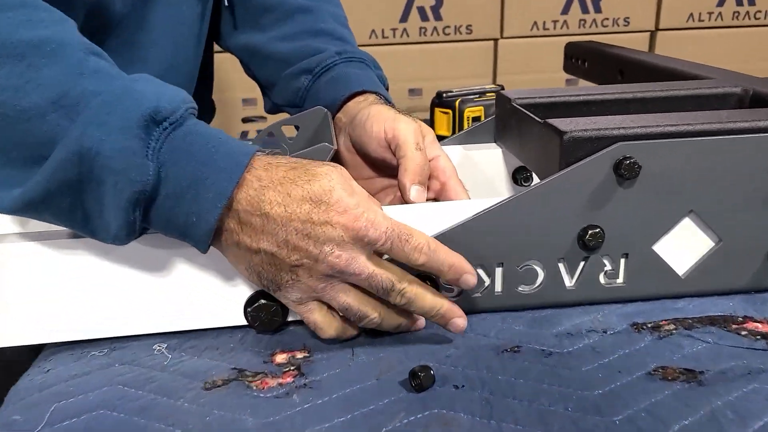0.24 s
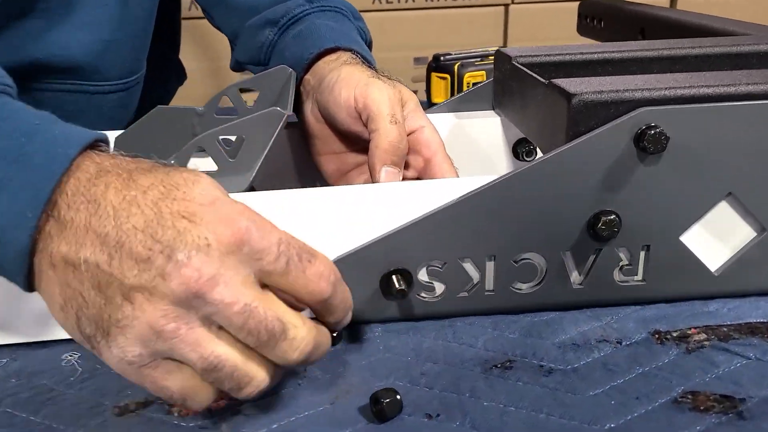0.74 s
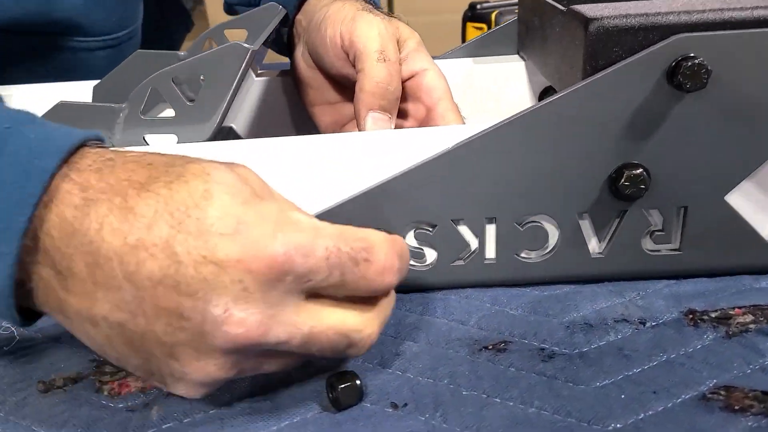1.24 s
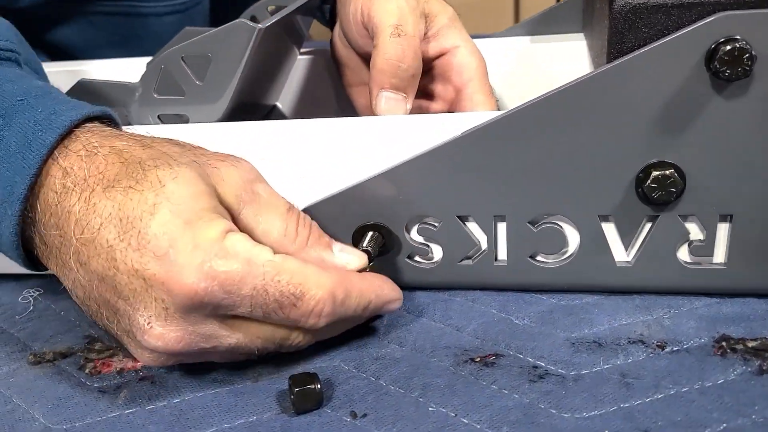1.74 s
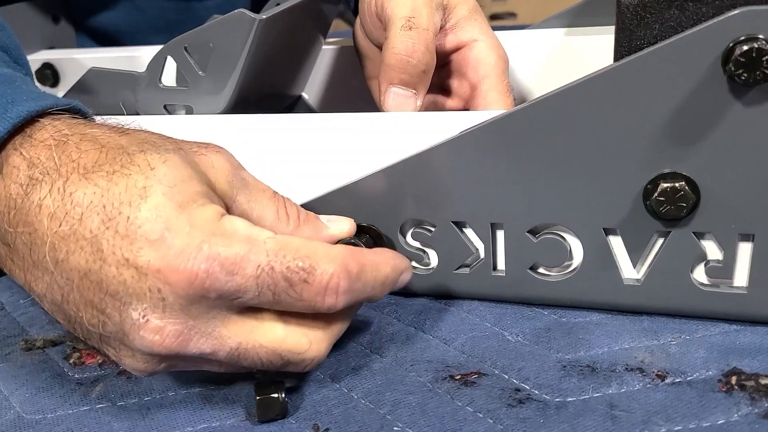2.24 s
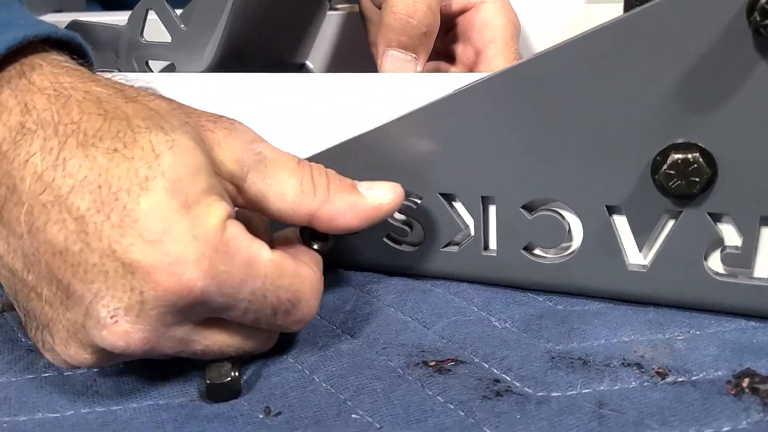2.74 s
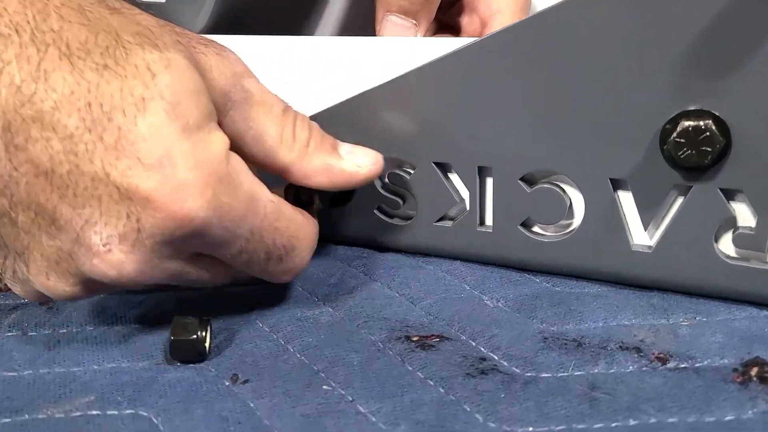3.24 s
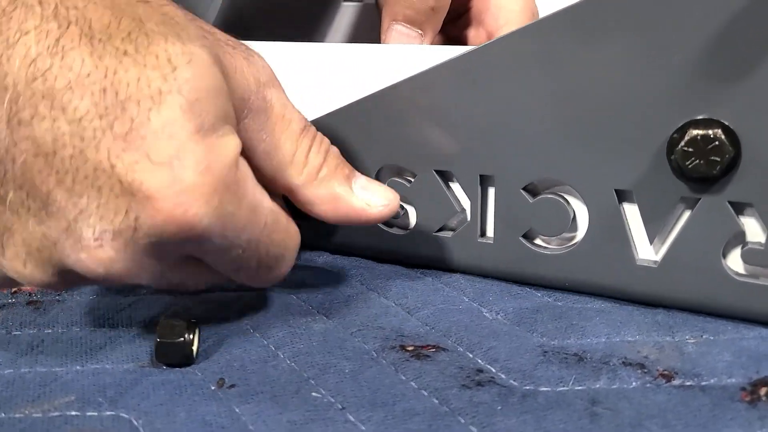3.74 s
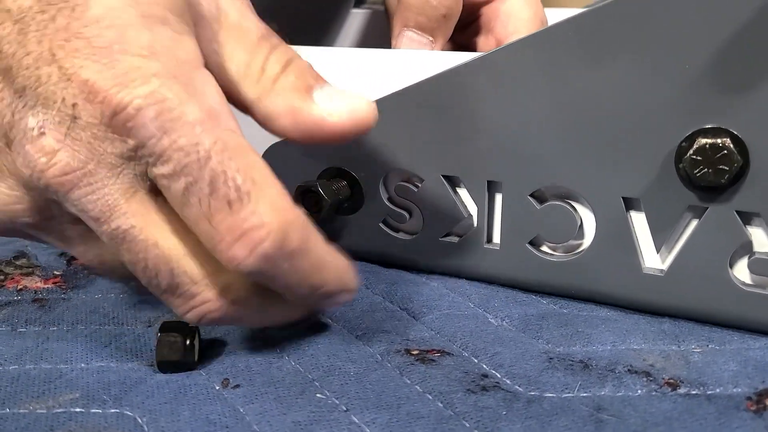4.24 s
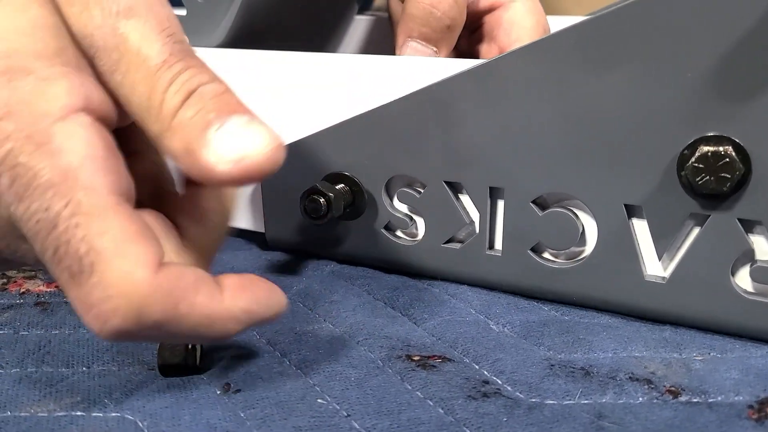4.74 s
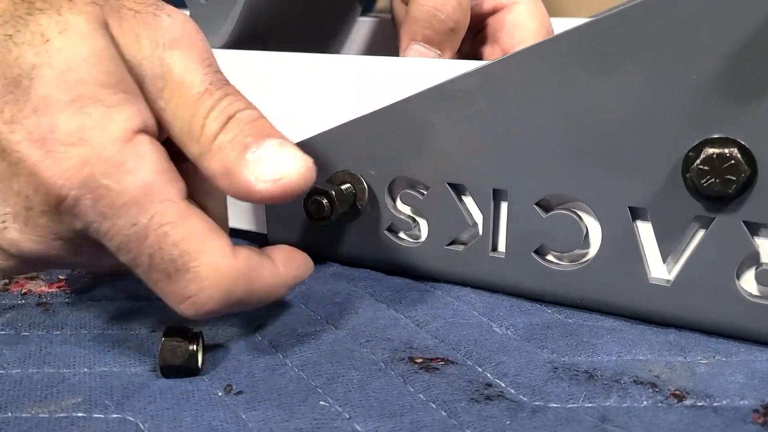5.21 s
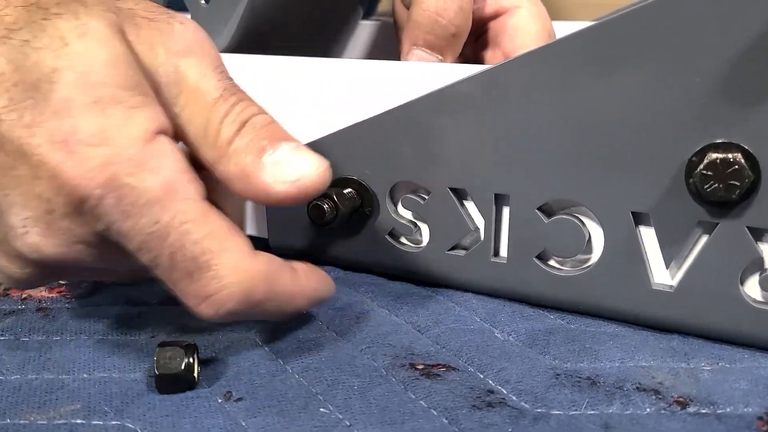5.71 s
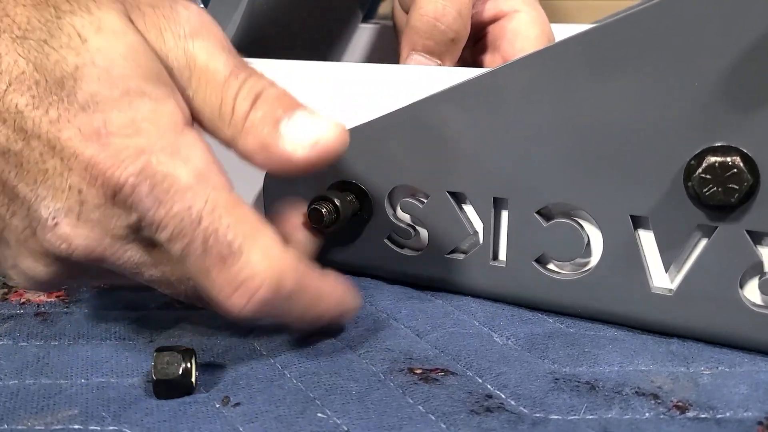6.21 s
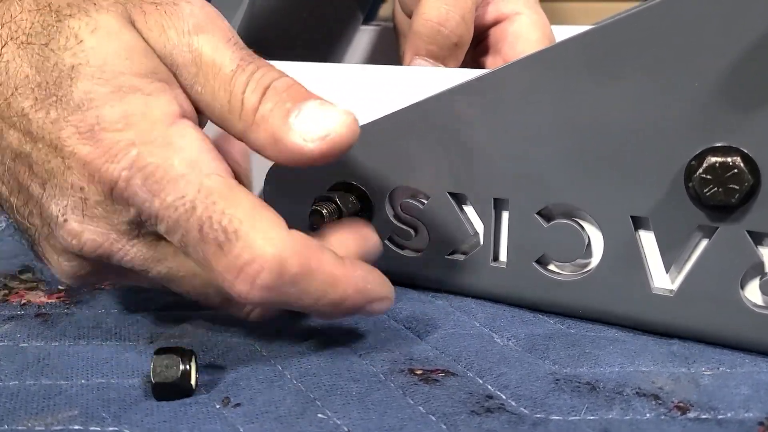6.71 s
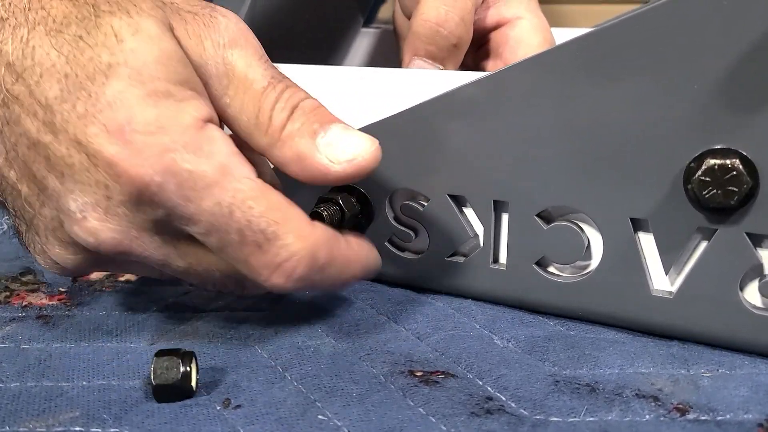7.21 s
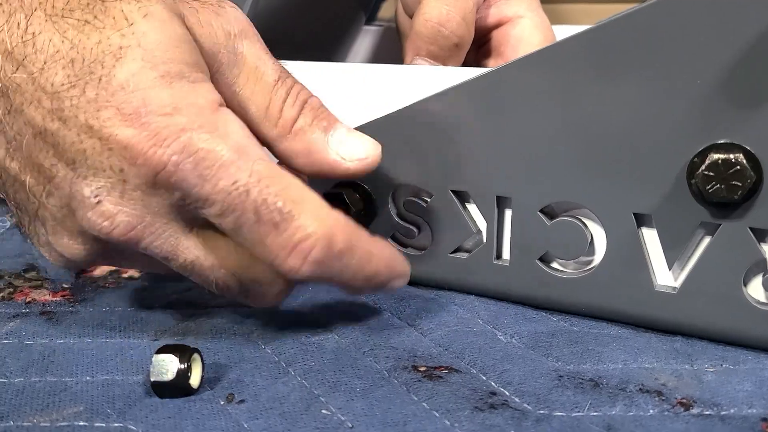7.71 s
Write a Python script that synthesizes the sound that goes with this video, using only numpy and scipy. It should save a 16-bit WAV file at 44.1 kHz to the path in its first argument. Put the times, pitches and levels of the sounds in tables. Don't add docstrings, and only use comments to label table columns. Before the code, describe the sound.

Close up in a quiet workshop, a hard fingertip taps and fumbles a steel nut onto a bolt, with uneven clicks, soft skin brushes and small pings. After about four seconds it is flicked round roughly four times a second: tick, brief ratcheting rattle, hard stop. The steel plate rings shortly, the hollow frame knocks dully, and a loose washer sometimes sings very high. Low machinery hums beneath in stereo.

```python
import sys
import numpy as np
from scipy import signal
from scipy.fft import rfft, irfft, next_fast_len
from scipy.io import wavfile
from scipy.ndimage import map_coordinates

SR = 44100
rng = np.random.default_rng(int(sys.argv[2]) if len(sys.argv) > 2 else 0)


def persist_wave(psi):
    counts = np.round(np.clip(psi, -1, 1) * 32767).astype(np.int16)
    wavfile.write(sys.argv[1], SR, np.atleast_2d(counts).T)


def undo_db(level):
    steps = np.asarray(level, float) / 20
    return 10 ** steps


N = 350815


def unit(x):
    return x / np.sqrt(np.mean(np.abs(x) ** 2) + 1e-20)


def along(points, hz):
    f, v = np.transpose(points)
    return np.interp(np.log(hz + 1), np.log(f + 1), v)


def filtered(x, response):
    n = x.shape[-1]
    m = next_fast_len(n + 8192)
    hz = np.fft.rfftfreq(m, 1 / SR)
    return irfft(rfft(x, m) * response(hz), m)[..., :n]


def resonances(modes, hz):
    center, width, db = np.transpose(modes)[..., None]
    sign = (-1) ** np.arange(len(modes))[:, None]
    return sign * undo_db(db) * 1j * hz * width / (center * center - hz * hz + 1j * hz * width)


def causal(gain):
    cepstrum = irfft(np.log(gain + 1e-6))
    half = len(cepstrum) // 2
    cepstrum[1:half] *= 2
    cepstrum[half + 1:] = 0
    return np.exp(rfft(cepstrum))


def grit(shape, spread_db):
    sizes = undo_db(spread_db * rng.standard_normal(shape))
    return unit(rng.standard_normal(shape) * sizes)


# frequency in Hz, level in dB per Hz.
AIR_COLOUR = [(12, -43), (20, -8.5), (70, -1.5), (113, -13), (198, -18.5), (347, -17.5), (472, -21),
              (949, -26.5), (1190, -26.5), (2460, -29.5), (3840, -32), (4180, -35), (4940, -40),
              (6900, -40.5), (7700, -46.5), (16000, -49.5)]
# frequency in Hz, likeness from -1 to 1.
AIR_LIKENESS = [(60, 0.96), (180, 0.84), (550, 0.73), (1650, -0.25), (4970, 0.1), (15000, -0.73)]
# frequency in Hz, width in Hz, rms level in dB.
MACHINERY = [(58.53, 3.7, -59.5), (118.6, 12.3, -65), (173.8, 9.1, -72), (240.8, 10, -76), (4200, 30, -84)]


def background():
    def colour(hz):
        turn = np.arccos(np.clip(along(AIR_LIKENESS, hz), -1, 1)) / 2
        return undo_db(along(AIR_COLOUR, hz)) * [np.cos(turn), np.sin(turn)]

    mid, side = filtered(rng.standard_normal((2, N)), colour)
    drift = map_coordinates(rng.standard_normal(24), [np.arange(N) * 2.65 / SR])
    air = undo_db(-55.5 + 0.52 * drift) * unit(np.array([mid + side, mid - side]))
    drones = 0
    for center, width, db in MACHINERY:
        hum = filtered(rng.standard_normal(N), lambda hz: resonances([(center, width, 0)], hz)[0] ** 2)
        drones = drones + undo_db(db) * unit(hum)
    return undo_db([[-2.6], [-1.4]]) * (air + drones)


# start in seconds, level in dB, frame knock in dB, brightness in dB.
STARTING_TAPS = [(.0081, -33.5, -24.5, -22), (.067, -40, -22, -17.5), (0.1261, -44.5, -19, -31),
                 (0.216, -23, -22, -10), (.3732, -37, -18, -38), (0.4052, -21.5, -26.5, -14),
                 (0.5662, -47, -24, -27.5), (0.6808, -34, -25, -18.5), (.8954, -53, -5.5, -17.5),
                 (1.3424, -54, -11.5, -26), (1.552, -34.5, -25, -24.5), (1.5841, -50, -21, -45),
                 (1.7071, -62, -6, -16), (1.7269, -58, -5, -35), (1.7848, -31.5, -16, -21),
                 (2.0661, -39.5, -13.5, -27), (2.2193, -41.5, -22, -17.5), (2.3516, -55.5, -11, -28),
                 (2.4432, -53, -9, -28), (2.6197, -49.5, -3, -21), (2.7759, -54, -13, -19),
                 (2.9361, -40, -15, -29), (2.96, -34, -22, -22), (3.1763, -37.5, -11, -19.5),
                 (3.2187, -46.5, -14, -19), (3.5523, -61.5, -12, -41), (3.6126, -53, 1, -24)]


def taps():
    return [(*row, 0.0029, 0.011) for row in STARTING_TAPS]


# start in seconds, level in dB.
SKIN_BRUSHES = [(.0259, -43), (.107, -53.5), (.1758, -57), (.2764, -49), (.4654, -50.5), (1.0081, -67),
                (2.0962, -56.5), (2.1587, -57.5), (2.2653, -62.5), (2.6896, -62), (2.6019, -65.5),
                (2.7555, -57.5), (3.2516, -52), (4.5488, -68)]


def brushes():
    return [(s, db, .02, .04, 0) for s, db in SKIN_BRUSHES]


# catch in seconds, catch level in dB, stop in seconds, stop level in dB.
NUT_TURNS = [(.583, -46.5, .619, -43), (.6397, -44.5, .6996, -48), (0.7332, -45, .775, -49.5),
             (1.7947, -25.5, 1.8249, -27), (3.2703, -40, 3.3175, -51), (3.6661, -46.5, 3.7299, -38),
             (4.0515, -42, 4.1013, -35), (4.3728, -29, 4.4062, -26.5), (4.6613, -25.5, 4.684, -23),
             (4.9435, -37, 4.9642, -34.5), (5.1943, -31.5, 5.2249, -44), (5.4673, -34, 5.4891, -26),
             (5.726, -30.5, 5.7573, -27), (5.9934, -32.5, 6.0047, -22), (6.253, -29, 6.2694, -21),
             (6.521, -26.5, 6.5355, -21), (6.7945, -38.5, 6.8092, -24.5), (7.0606, -25, 7.0936, -33.5),
             (7.288, -40, 7.32, -35.5), (7.6008, -44.5, 7.6191, -41.5), (7.9253, -38.5, 7.9499, -42)]


def turns(landings):
    wait = 0.39
    slower = 0.19
    grind_span = 0.74
    thump_db = 3
    rows = []
    for catch, catch_db, stop, stop_db in NUT_TURNS:
        since, landed_db = min((catch - row[0], row[1]) for row in landings if row[0] < catch)
        turn = stop - catch
        if since < .06:
            drag_db = (landed_db + catch_db) / 2 - 10
            rows.append((catch - since / 2, drag_db, wait * since, since / 2, -thump_db))
        catch_swell = min(0.0052 + slower * turn, wait * since)
        rows.append((catch, catch_db, catch_swell, .013, -thump_db))
        grind_db = (catch_db + stop_db) / 2 - 6
        grind_swell = min(grind_span * turn, wait * (since + turn / 2))
        rows.append((catch + turn / 2, grind_db, grind_swell, grind_span * turn, -thump_db))
        rows.append((stop, stop_db, .002 + slower * turn, 0.0042 + slower * turn / 2, thump_db))
        rows.append((stop + 2 * .004, stop_db - 11, .004, 0.015, 0))
    return rows


# start in seconds, level in dB, frame knock in dB, brightness in dB.
SEATED_TOUCHES = [(3.983, -35.5, -8, -14), (4.0126, -43, -9, -25), (4.3361, -37, -4.5, -17.5),
                  (4.4303, -29, -17.5, -22.5), (4.631, -37.5, -6.5, -19), (4.9087, -30, -15.5, -18),
                  (5.172, -30, -15.5, -15.5), (5.278, -46, -20, -12), (5.3395, -38.5, -19, -5),
                  (5.4403, -34.5, -9.5, -11), (5.624, -50.5, -17, -14), (5.7026, -33, -14, -15.5),
                  (5.9647, -32, -14, -18.5), (6.1531, -48, 2.5, -20.5), (6.2221, -32, -16, -21),
                  (6.4922, -31.5, -29, -15), (6.761, -33, -14, -22), (7.033, -45, -9, -20),
                  (7.045, -29.5, -12, -11.5), (7.1541, -49.5, -15, -22), (7.2686, -42.5, -9.5, -27),
                  (7.5563, -52.5, 3, -30), (7.8375, -64, 2.5, -28), (7.8642, -54, -4, -34),
                  (7.9027, -42, -4.5, -27)]


def touches():
    return [(*row, 0.0021, 0.0083) for row in SEATED_TOUCHES]


# time in seconds, frame knock in dB.
FRAME_GRIP = [(0, -23.5), (.8, -24), (1, -5), (1.8, -16), (2.1, -9.5), (2.7, -7.5), (3.3, -9), (4.1, -12.5),
              (4.7, -14), (5.2, -17), (5.75, -12.5), (6, -9.5), (6.8, -10), (7.1, -17.5), (7.3, -17.5),
              (7.6, -1), (7.95, -9)]


def volleys():
    landings = taps() + touches()
    rows = list(landings)
    for s, db, swell, fade, thump_db in brushes() + turns(landings):
        over = db + 33
        knock_db = np.interp(s, *np.transpose(FRAME_GRIP)) - 0.19 * over + thump_db
        rows.append((s, db, knock_db, -19 + 0.57 * over, swell, fade))
    return sorted(row for row in rows if row[0] < N / SR)


def plate(hz, modes, bed, dense_db):
    damped = [(c, w + 35, db - along(bed, c)) for c, w, db in modes]
    dense = np.full(len(hz), undo_db(dense_db))
    return causal(undo_db(along(bed, hz))) * np.vstack([resonances(damped, hz), dense])


# frequency in Hz, width in Hz, level in dB.
LOOSE_MODES = [(1122, 60, -7.5), (2150, 70, -8), (2770, 40, -4.5), (3020, 18, 5), (3620, 38, -0.5),
               (4110, 27, -10), (4730, 40, -5.5), (4910, 100, -6.5), (5580, 66, -5.5), (6090, 38, -12),
               (8250, 41, -14.5), (9590, 42, -16), (10240, 34, -15.5), (10950, 35, -16.5)]
# frequency in Hz, level in dB per Hz.
LOOSE_COLOUR = [(530, -56), (900, -15.5), (1120, -11), (1450, -14.5), (2050, -2.5), (2600, -4.5),
                (3400, -3), (4400, -4.5), (6000, -9), (9500, -21), (12500, -28.5), (15800, -49.5)]
# frequency in Hz, width in Hz, level in dB.
SEATED_MODES = [(1070, 28, -15), (1610, 18, -22), (2763, 25, -7), (2996, 34, -1), (3788, 40, 0),
                (4120, 20, -19), (4960, 110, -4), (5400, 42, -10), (5800, 58, -6.5), (7100, 70, -1.5),
                (8020, 140, -12), (8800, 40, -16.5), (9730, 33, -21.5), (10000, 23, -13.5),
                (10700, 65, -18), (12200, 57, -21)]
# frequency in Hz, level in dB per Hz.
SEATED_COLOUR = [(530, -50.5), (900, -10.5), (1120, -5.5), (1350, -15.5), (1600, -3.5), (2200, -9.5),
                 (3050, 3), (3800, -4), (4500, -4), (5600, -5), (7500, -14.5), (10400, -27), (15800, -60)]
# frequency in Hz, width in Hz, level in dB.
FRAME_MODES = [(370.4, 44, -3), (460, 128, -3.5), (529.4, 74, 0.35), (641.5, 65, -3.5), (779, 140, -8.5)]


def contacts():
    size, lead = 8192, 3072
    t = (np.arange(size) - lead) / SR
    hz = np.fft.rfftfreq(size, 1 / SR)
    steel = np.zeros((2, N + size))
    box = np.zeros(N + size)
    frame = resonances(FRAME_MODES, hz)
    edges = signal.windows.tukey(size, .3)
    treble = np.log(causal(undo_db(np.clip(np.log2(hz / 4000 + 1e-9), 0, 1.3))))
    rows = volleys()
    seated_s = 3.9
    starting = [r for r in rows if r[0] < seated_s]
    spinning = [r for r in rows if r[0] >= seated_s]
    loose = plate(hz, LOOSE_MODES, LOOSE_COLOUR, dense_db=2.0)
    seated = plate(hz, SEATED_MODES, SEATED_COLOUR, dense_db=2.0)
    for table, modes in (starting, loose), (spinning, seated):
        for k, (s, db, knock_db, bright_db, swell, fade) in enumerate(table):
            rise_db = -10 * (np.abs(t) / max(1.11 * swell, .0003)) ** 1.39
            fall_db = -10 * t / max(0.81 * fade, .0005)
            force = edges * undo_db(np.where(t < 0, rise_db, fall_db))
            volley = rfft(grit(size, spread_db=6.5) * force)
            shine = np.exp((bright_db + 17.0) * treble)
            plate_mix = undo_db(rng.normal(0, 3.8, len(modes))) @ modes
            frame_mix = undo_db(rng.normal(0, 2.77, len(FRAME_MODES))) @ frame
            ring = irfft(volley * shine * plate_mix)
            knock = irfft(volley * frame_mix)
            strength = np.linalg.norm(force)
            at = round(s * SR)
            steel[k % 2, at:at + size] += undo_db(db - 1.62) * strength / np.linalg.norm(ring) * ring
            box[at:at + size] += undo_db(db + knock_db + 2.0) * strength / np.linalg.norm(knock) * knock
    return steel[:, lead:N + lead], box[lead:N + lead]


# start in seconds, peak level in dB, seconds to die by 68 dB.
WASHER_BLOWS = [(0.2138, -41.5, 0.36), (0.2994, -59, 0.24), (0.4054, -62, 0.1), (0.6799, -50.5, 0.46),
                (3.2206, -70, 0.45), (5.1744, -67, 0.45), (5.1906, -49, 0.41), (5.2794, -55, 0.58),
                (5.3411, -50.5, 0.58), (5.4879, -64.5, 0.35), (6.8069, -71, 0.33), (7.0453, -43.5, 0.37),
                (7.5986, -75, 0.45)]


def washer():
    out = np.zeros(N + SR)
    t = np.arange(SR // 2) / SR
    tone_hz, beat_hz = 12941, 9
    pair = np.sin(2 * np.pi * tone_hz * t) + 0.39 * np.sin(2 * np.pi * (tone_hz + beat_hz) * t)
    for s, db, t60 in WASHER_BLOWS:
        decay = undo_db(db + 7.5 - 68 * t / max(t60, .02))
        out[round(s * SR):][:len(t)] += decay * (1 - np.exp(-t / 0.001)) * pair
    return out[:N]


# start in seconds, frequency in Hz, peak level in dB, seconds to die by 60 dB.
PLATE_PINGS = [
    (.3725, 2233, -37, 0.073),
    (.403, 2117, -28, 0.065),
    (1.005, 1196, -54.5, 0.11),
    (1.583, 2000, -44.5, .06),
    (2.627, 2700, -47, .1),
]


def pings():
    out = np.zeros(N + SR)
    t = np.arange(SR // 5) / SR
    for s, hz, db, t60 in PLATE_PINGS:
        flutter = 1 + 0.38 * np.sin(2 * np.pi * 70 * t + rng.uniform(0, 2 * np.pi))
        envelope = undo_db(db - 60 * t / t60) * (1 - np.exp(-t / 0.0012))
        out[round(s * SR):][:len(t)] += envelope * flutter * np.sin(2 * np.pi * hz * t)
    return out[:N]


# time in seconds, steel level in dB, frame level in dB.
FINGER_RUBS = [
    [(.558, -42.5, -70), (.66, -41, -66), (.78, -42.5, -82), (.81, -62, -75)],
    [(2.0, -62, -71), (2.15, -56, -66), (2.4, -69, -68), (2.75, -60.5, -61), (2.95, -72, -74)],
    [(3.0, -86, -70), (3.132, -69, -70), (3.6, -74, -69)],
    [(7.35, -75, -74), (7.658, -82, -62), (7.9, -74, -70)],
]


def slide():
    t = np.arange(N) / SR
    level = np.zeros((2, N))
    for rows in FINGER_RUBS:
        s, *columns = np.transpose(rows)
        level += [undo_db(np.interp(t, s, db, -120, -120)) for db in columns]

    def skin_on_steel(hz):
        return undo_db(along(LOOSE_COLOUR, hz)) / (1 + (hz / 5730) ** 4)

    rub = unit(filtered(grit(N, spread_db=5.5), skin_on_steel))
    drum = unit(filtered(grit(N, spread_db=1), lambda hz: resonances(FRAME_MODES, hz).sum(axis=0)))
    return undo_db(-8.5) * level[0] * rub + undo_db(-4.5) * level[1] * drum


# start in seconds, peak level in dB.
NAIL_SNAPS = [
    (3.0753, -58),
    (3.3643, -57),
    (3.394, -28.5),
    (5.2766, -50),
    (5.3386, -35.5),
]


def snaps():
    out = np.zeros(N)
    t = np.arange(SR // 200) / SR
    for s, db in NAIL_SNAPS:
        out[round(s * SR):][:len(t)] += undo_db(db + 5.5 - 60 * t / .0015) * rng.standard_normal(len(t))
    return signal.lfilter(*signal.butter(2, [250, 7500], "bandpass", fs=SR), out)


# frequency in Hz, left minus right in dB.
LEFT_LEAN = [(700, -11), (1300, -6.5), (2400, 0.5), (4400, -8.5), (8100, -8), (15000, -10.5)]


def microphones(x):
    side = np.array([[1], [-1]]) / 2
    lag = 14 / 44100

    def path(hz):
        return undo_db(side * along(LEFT_LEAN, hz)) * np.exp(-2j * np.pi * hz * lag * (.5 - side))

    return filtered(x, path)


def tail(t60s, size):
    hz, t, z = signal.stft(rng.standard_normal((2, SR // 2)), SR, nperseg=128)
    decay = undo_db(-60 * t / np.maximum(along(t60s, hz), .01)[:, None])
    out = signal.istft(z * decay, SR, nperseg=128)[1]
    return np.pad(out / np.linalg.norm(out[0]), ((0, 0), (size, 0)))[:, :SR // 2]


# frequency in Hz, seconds to die by 60 dB.
NEAR_SCATTER = [(1000, 0.024), (10000, 0.016)]
# frequency in Hz, seconds to die by 60 dB.
WORKSHOP_ECHO = [(300, 0.3), (1500, 0.37), (2600, 0.64), (4100, 0.38), (8000, 0.26), (14000, 0.06)]


def shop(x, near_db, far_db):
    near = tail(NEAR_SCATTER, size=20)
    shared = .25
    from_bolt = microphones(near[0] - near[1]) / np.sqrt(2)
    near = np.sqrt(1 - shared) * near + np.sqrt(shared) * from_bolt
    echo = undo_db(near_db) * near + undo_db(far_db) * tail(WORKSHOP_ECHO, size=250)
    return signal.oaconvolve(x[None], echo, axes=1)[:, :N]


def scene():
    steel, box = contacts()
    steel[0] += slide() + pings()
    high = washer()
    room = sum(shop(group, near_db=-0.5, far_db=-15.0) for group in steel)
    room = room + shop(box + undo_db(3) * high, near_db=-14, far_db=-16.5)
    frame = undo_db([[-1.2], [1.2]]) * box
    direct = microphones(steel.sum(axis=0) + snaps())
    singing = np.array([undo_db(-10.5) * high, np.roll(high, 15)])
    return direct + singing + frame + room + background()


def low_pass(x):
    return signal.sosfilt(signal.butter(12, 16360, fs=SR, output="sos"), x)


def record(dry):
    mix = filtered(dry, lambda hz: hz < 15830)
    return low_pass(mix)


dry = scene()
out = record(dry)
persist_wave(out)
```